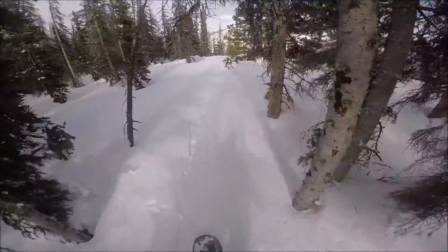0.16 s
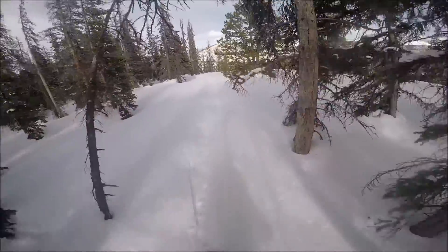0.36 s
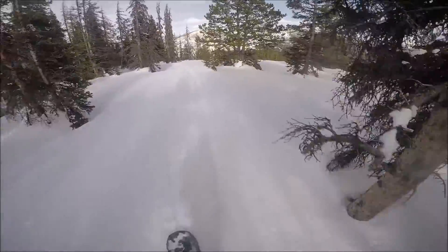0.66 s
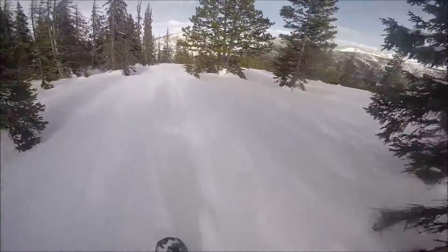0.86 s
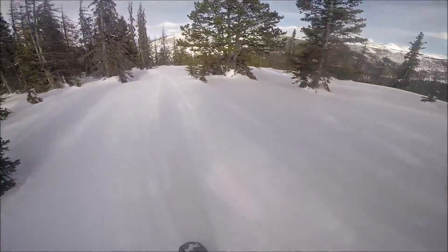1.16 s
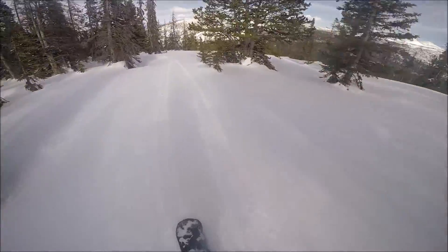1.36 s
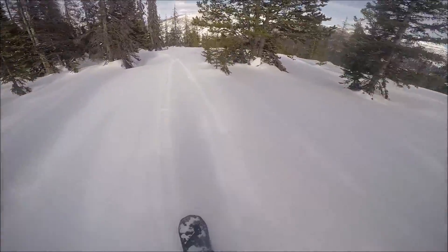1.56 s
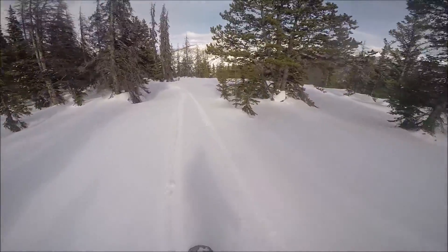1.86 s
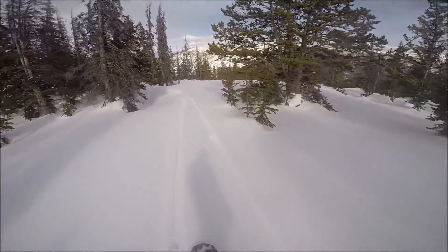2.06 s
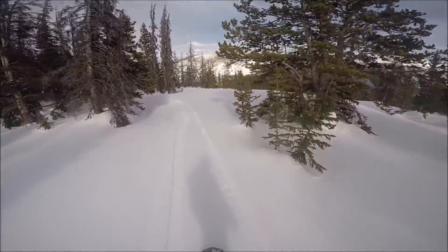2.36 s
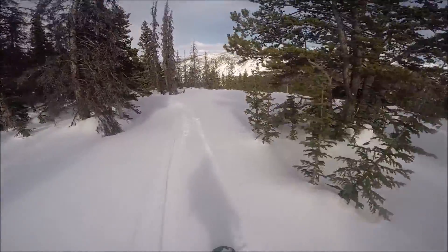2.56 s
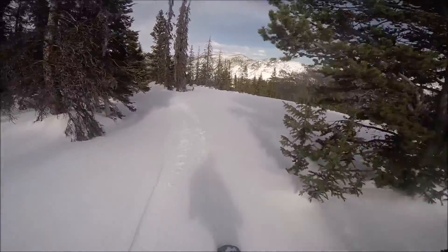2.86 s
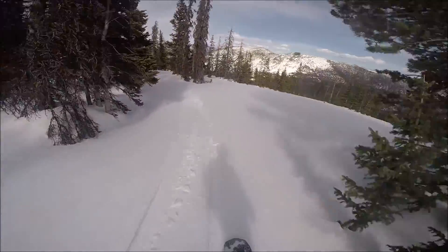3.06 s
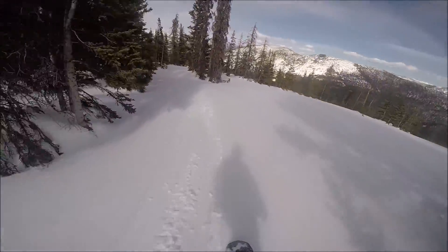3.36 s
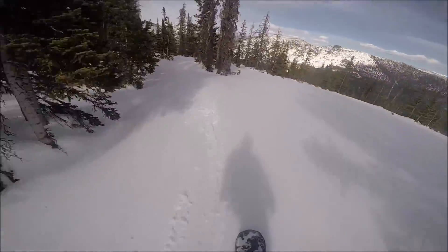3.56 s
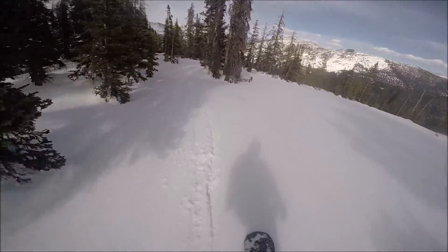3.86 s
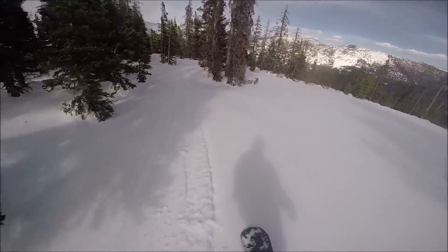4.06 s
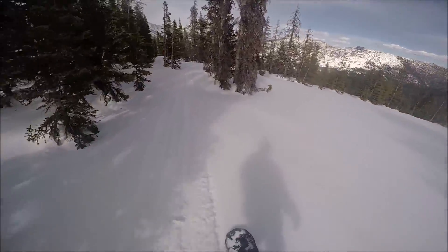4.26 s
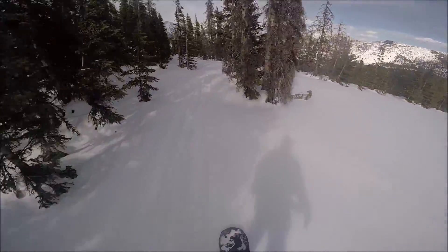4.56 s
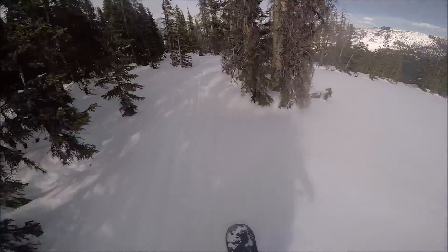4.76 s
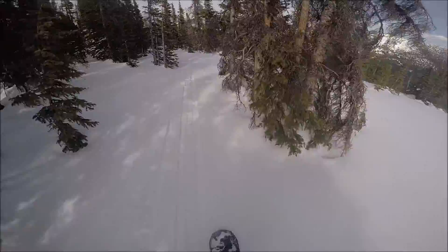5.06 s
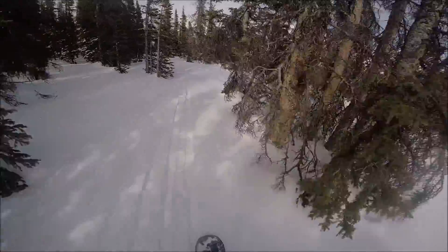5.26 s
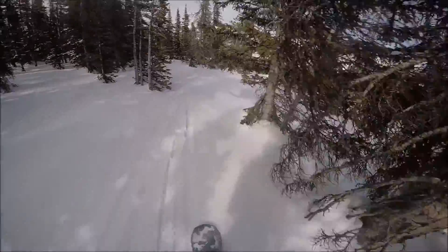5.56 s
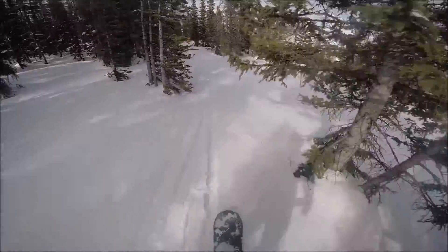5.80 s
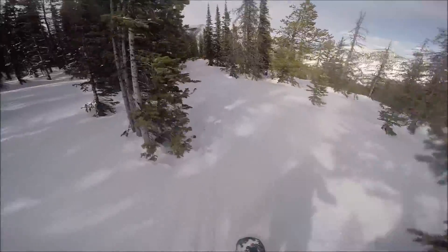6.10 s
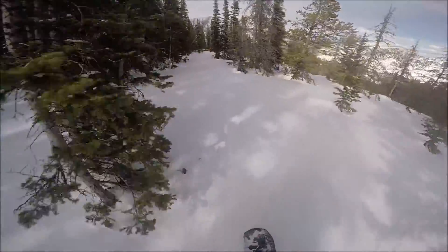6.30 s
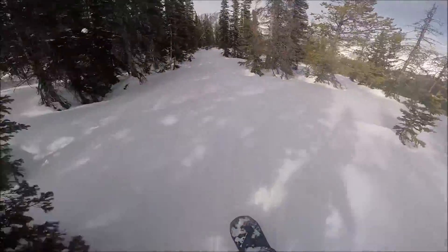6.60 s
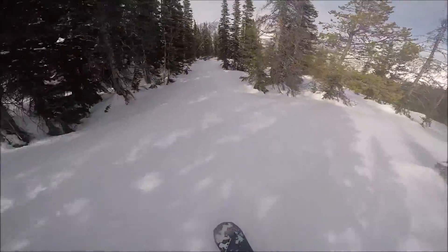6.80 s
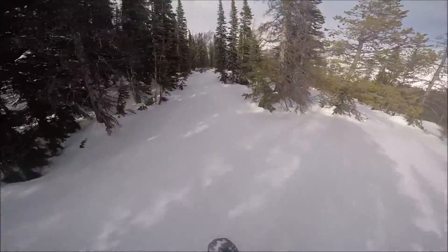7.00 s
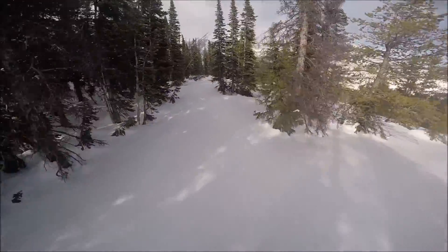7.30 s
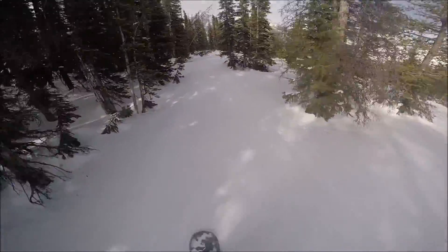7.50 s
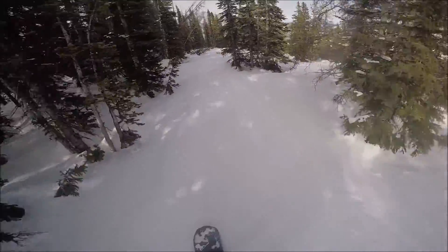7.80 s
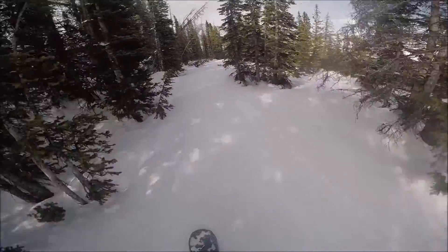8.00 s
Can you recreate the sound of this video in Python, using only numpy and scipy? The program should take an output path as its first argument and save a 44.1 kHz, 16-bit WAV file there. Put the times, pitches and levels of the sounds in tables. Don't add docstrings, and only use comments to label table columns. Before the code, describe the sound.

Outdoors on a wooded snowy slope, a board slides through powder, heard through a worn plastic case. Wind thumps and shakes the case, its strap rubs, ticks and briefly squeaks. The quiet glide swells into a hollow, grainy hiss with brighter sprays; one sharp branch slap dominates late, followed by the strongest snow rush and little pinging knocks.

```python
import sys
import numpy as np
from scipy import signal
from scipy.io import wavfile
from scipy.ndimage import uniform_filter1d

SR = 44100
rng = np.random.default_rng(int(sys.argv[2]) if len(sys.argv) > 2 else 0)


def volts(x):
    e = np.asarray(x, float) / 20
    return 10 ** e


def digitize_waveform(pressure):
    field = np.atleast_2d(pressure).T
    bounded = np.clip(field, -1, 1)
    quanta = np.round(bounded * 32767).astype(np.int16)
    wavfile.write(sys.argv[1], SR, quanta)


N = 359104

# frequency in Hz, width in Hz, gain in dB.
CAVITY = (1465, 47, 8.66)
# time in seconds, level in dB.
PACE = [
    (0.0, -9.5),
    (0.6, -4.5),
    (1.8, -6.5),
    (3.0, -7),
    (3.5, 0),
    (4.7, 1),
    (5.5, 3),
    (6.6, 3),
    (8.14, 5),
]
# frequency in Hz, level in dB, 60 dB decay time in seconds.
STRUCK = [(268, -0.5, 0.04), (470, -3.5, 0.027), (800, -5.5, 0.019), (1370, -6, 0.01), (1550, -0.5, 0.0073),
          (2000, -1, 0.0071), (2630, 3, 0.013), (3380, -8, 0.014), (4450, -4, 0.0091), (4170, -3, 0.011),
          (6400, -21, .008), (7800, -12, 0.0029)]


def rms_one(x):
    return x / np.sqrt(np.mean(x ** 2) + 1e-20)


def in_time(rows):
    s, *columns = np.transpose(rows)
    return [np.interp(np.arange(N) / SR, s, c) for c in columns]


def drift(rate):
    r = np.exp(-80 * np.pi * rate / SR)
    slow = signal.lfilter([1], [1, -2 * r, r * r], rng.standard_normal(N // 40 + 2002))[2000:]
    return np.interp(np.arange(N) / 40, np.arange(len(slow)), rms_one(slow))


def swells(rows, height):
    t = np.arange(0, N, 40) / SR
    total = sum(height(value) * np.exp(-(2 * (t - s) / length) ** 2) for s, value, length in rows)
    return np.interp(np.arange(N) / SR, t, total)


def evened(x, share, seconds):
    level = np.sqrt(uniform_filter1d(x ** 2, int(seconds * SR)) + 1e-3 * np.mean(x ** 2))
    return rms_one(x / level ** share)


def resonate(x, hz, width_hz):
    r = np.exp(-np.pi * width_hz / SR)
    poles = [1, -2 * r * np.cos(2 * np.pi * hz / SR), r * r]
    return signal.lfilter(np.array([1, 0, -1]) * (1 - r * r) / 2, poles, x)


def ring(push, hz, t60):
    r, w = volts(-60 / (t60 * SR)), 2 * np.pi * hz / SR
    return signal.lfilter([0, np.sin(w)], [1, -2 * r * np.cos(w), r * r], push + 1e-18)


def grains(per_s, spread_db):
    sizes = volts(spread_db * np.minimum(rng.exponential(1, N), 4)) * rng.choice([-1, 1], N)
    return rms_one(sizes * (rng.random(N) < per_s / SR))


def banded(sources, spectrum, patchy_db, bright_db=0):
    out, plain = 0, 0
    edges = 110 * 2 ** np.arange(0, 7.4, 1 / 3)
    hz_points, db_points = np.transpose(spectrum)
    together = np.tanh(drift(16))
    for k, (low, high) in enumerate(zip(edges, edges[1:])):
        hz = np.sqrt(low * high)
        band = signal.sosfilt(signal.butter(2, [low, high], "band", fs=SR, output="sos"), sources[k % 2])
        level_db = np.interp(np.log(hz), np.log(hz_points), db_points)
        band *= volts(level_db + patchy_db * (together + drift(58)))
        plain = plain + np.mean(band ** 2)
        if hz > CAVITY[0]:
            band = band * volts(bright_db * min(np.log2(hz / CAVITY[0]), 1.3))
        out = out + band
    return out / np.sqrt(plain)


def snow():
    # time in seconds, load in dB, edge angle as spray brightness in dB.
    glide = [(0.0, -68, -17), (0.45, -59, -15), (1.0, -60.5, -5), (1.7, -73, 25), (2.13, -66.5, -14),
             (2.8, -63.5, -10), (3.3, -58.5, -9), (3.8, -53.5, -9.5), (4.5, -47.5, -14),
             (4.95, -50.5, -3.5), (5.5, -46.5, 0.5), (5.85, -51.5, -7.5), (6.35, -47, -6),
             (6.72, -53.5, -6.5), (7.19, -42, -7.5), (7.55, -40, -6.5), (7.66, -46.5, -8),
             (8.14, -51, -1.5)]
    # time in seconds, load change in dB, length in seconds.
    digs = [(0.0, 14, 0.084), (.28, 5, 0.27), (1, -5.5, 0.57), (2.3, 7, 0.14), (2.94, 4, 0.14),
            (3.07, -2, 0.11), (3.232, 2, 0.082), (3.33, -2.5, .06), (3.41, 6, .1), (3.55, 8.5, 0.15),
            (3.8, -3, 0.038), (3.85, 0, 0.04), (4.12, 2.5, 0.087), (4.35, 1.2, 0.11), (5.01, 1.5, 0.19),
            (5.23, 2.8, 0.058), (5.4, 3.5, 0.066), (5.51, -4, 0.05), (5.68, 3, 0.35), (6, 4, 0.18),
            (6.28, -2, 0.13), (6.6, -5.5, 0.038), (6.662, 3.5, 0.041), (7.0, -1.5, 0.25), (7.13, 0, 0.1),
            (6.145, 5, 0.016), (7.27, 1.5, 0.11), (7.51, 1, 0.053), (7.78, 0, 0.041), (7.94, 2, 0.07),
            (8.05, 10.5, 0.21)]
    # time in seconds, brightness in dB, length in seconds.
    crusts = [
        (3.687, 5.5, 0.023),
        (3.85, 2, 0.027),
        (4.872, 4, 0.044),
        (5.012, 5.5, 0.042),
        (5.146, 4.5, 0.039),
        (5.228, 2.5, 0.072),
        (5.39, 0.5, 0.051),
        (5.465, 1.5, 0.019),
        (5.664, 4, .08),
        (5.905, 0.5, 0.032),
    ]
    # frequency in Hz, density in dB per Hz.
    hiss_spectrum = [(350, -41), (600, -28.5), (1100, -1.5), (1460, 0), (1700, -2), (2290, -6.5),
                     (4190, -11.5), (5630, -27.5), (6160, -25), (7400, -39), (8600, -60)]
    # frequency in Hz, density in dB per Hz.
    rumble_spectrum = [(110, -13), (150, 3), (220, 1.5), (300, -6.5), (480, -9), (700, -13.5),
                       (1000, -23.5), (3000, -48)]
    load_db, spray_db = in_time(glide)
    dig_db = swells(digs, float)
    load_db = load_db + dig_db
    rumble_db = -56 + in_time(PACE)[0] + 0.11 * (load_db - load_db.mean())
    burst_db = swells(crusts, float) - 0.15 * dig_db
    bright_db = 0.49 * (np.clip(spray_db, -14, 4) + 5.5) + burst_db

    crystals = [rng.standard_normal(N) + 0.57 * grains(1500, spread_db=7.0) for side in range(2)]
    hiss = banded(crystals, hiss_spectrum, patchy_db=0.93, bright_db=bright_db)
    rumble = volts(rumble_db) * banded(crystals, rumble_spectrum, patchy_db=1.3)

    hz, width_hz, db = CAVITY
    waver_hz, waver_db = 29.6, 1
    flex = .5 + .5 * np.tanh(drift(6.9))
    sung = flex * resonate(hiss, hz + waver_hz, width_hz)
    sung += (1 - flex) * resonate(hiss, hz - waver_hz, width_hz)
    hiss += (volts(db + 0.5 + waver_db * drift(23.5)) - 1) * sung
    return volts(load_db + 1.0) * hiss + rumble


def wind():
    # time in seconds, level in dB, length in seconds.
    gusts = [(.43, -43, 0.24), (.7, -32, 0.17), (.97, -34.5, 0.1), (1.22, -31.5, 0.072), (1.5, -30.5, 0.18),
             (1.9, -34, 0.21), (2.15, -36.5, 0.2), (2.38, -37, 0.27), (2.68, -46.5, 0.39),
             (3.19, -39, 0.17), (3.5, -38, 0.085), (4.08, -31, 0.042), (4.67, -32, 0.1), (4.92, -25, 0.17),
             (5.33, -32.5, 0.21), (5.46, -26.5, 0.095), (5.65, -29, 0.097), (5.85, -26.5, 0.11),
             (6.1, -27.5, 0.11), (6.3, -26, 0.12), (6.78, -32, 0.29), (7.03, -38, 0.091), (7.68, -44, 0.17),
             (7.8, -30, 0.072), (7.96, -25.5, 0.13)]
    # time in seconds, level in dB, length in seconds.
    bumps = [(.4, -47.5, 0.15), (.91, -36, 0.12), (1.05, -42.5, 0.12), (1.17, -45, 0.098),
             (1.44, -36, 0.071), (1.95, -49.5, 0.15), (2.43, -45, 0.085), (2.59, -49, 0.064),
             (2.79, -59, 0.057), (3.06, -44, 0.11), (3.38, -35.5, 0.068), (3.83, -45.5, 0.19),
             (3.94, -39, 0.045), (4.04, -41, 0.039), (4.17, -54, 0.12), (4.83, -40.5, 0.12),
             (5.27, -40.5, 0.7), (5.57, -50, 0.29), (6.3, -41.5, 0.3), (6.66, -45.5, 0.35),
             (6.82, -44, 0.056), (7.2, -49, 0.77), (7.62, -52, 0.096), (7.76, -46, 0.069),
             (8.09, -42, 0.12)]
    mount_hz, mount_width_hz, lull_db = 78.5, 9.6, -1
    pace_db, = in_time(PACE)
    buffet = volts(-40.5 + 0.52 * pace_db + lull_db * drift(2.4)) + swells(gusts, volts)
    shake = volts(-44 + 0.91 * pace_db + lull_db * drift(5.8)) + swells(bumps, volts)

    push = rng.standard_normal((2, N + SR))
    lumps = signal.sosfilt(signal.butter(2, [14, 37], "band", fs=SR, output="sos"), push[0])
    swing = resonate(push[1], mount_hz, mount_width_hz)
    heavy = signal.butter(2, 60, fs=SR, output="sos")
    steep = signal.butter(4, 110, fs=SR, output="sos")
    lumps = signal.sosfilt(heavy, buffet * evened(lumps[SR:], 0.51, 0.093))
    swing = signal.sosfilt(steep, shake * evened(swing[SR:], 0.26, 0.041))
    flutter = rms_one(resonate(resonate(push[0], 188.0, 42), 188.0, 42)[SR:])
    return lumps + swing + volts(-34.0) * uniform_filter1d(shake, SR // 2) * flutter


def self_noise():
    # frequency in Hz, density in dB per Hz.
    noise_spectrum = [(71, -31), (120, -22), (339, -11), (955, -18.5), (1430, -21), (4220, -26.5),
                      (9000, -30), (15500, -32.5)]
    return volts(-65) * banded(rng.standard_normal((2, N)), noise_spectrum, patchy_db=.25)


def held(start, length, height):
    t = np.arange(0, N, 40) / SR
    start, length = start[:, None], length[:, None]
    edge_s = 0.069
    shape = np.clip(np.minimum(t - start, start + length - t) / edge_s + .5, 0, 1)
    return np.interp(np.arange(N) / SR, t, np.max(shape * height[:, None], axis=0))


def strap():
    # frequency in Hz, width in Hz, level in dB.
    shell_modes = [(1970, 100, 4.5), (2700, 280, -1), (3600, 260, -3), (4300, 240, 1), (5230, 240, -3),
                   (6125, 200, -4.5), (7640, 580, -15.5), (8400, 280, -11), (9840, 1900, -15.5)]
    # start in seconds, length in seconds, level in dB,
    # pressure in dB that favours the lower resonances.
    drags = [(0.34, 0.53, -80, -4), (0.704, 0.71, -81, 13), (1.06, 0.35, -75, 11.5), (1.403, 0.21, -70, 7),
             (1.6, .17, -80, 4), (1.716, 0.89, -77.5, 12.5), (2.3, 0.76, -80.5, 4), (3.595, 1.4, -83, -15),
             (4.92, 0.21, -80.5, 30), (5.225, 0.19, -68, 7), (5.374, 0.41, -66, -7), (5.848, 0.36, -81, 6),
             (6.242, 0.48, -71.5, 2), (6.747, 0.27, -69, 5), (7.328, 0.48, -75, 7), (7.8, .4, -71.5, 4)]
    # start in seconds, level in dB, frequency in Hz, width in Hz, fade in seconds.
    squeaks = [
        (1.945, -55.5, 2140, 150, 0.18),
        (1.96, -58.5, 1514, 60, 0.057),
        (1.96, -57.5, 2060, 150, 0.32),
    ]
    start, length, drag_db, pressure_db = np.transpose(drags)
    rest_db = -83
    slip = volts(1.5 * drift(13))
    friction = rng.standard_normal(N) + 0.4 * grains(900, spread_db=4.0)
    friction = signal.sosfilt(signal.butter(2, 1500, "high", fs=SR, output="sos"), friction)
    modes = [(-1) ** k * volts(db) * resonate(friction, hz, width)
             for k, (hz, width, db) in enumerate(shell_modes)]
    low, high = rms_one(sum(modes[:5])), rms_one(sum(modes[5:]))
    pressed = held(start, length, volts(drag_db + 0.57 * pressure_db + 4.5))
    dragged = held(start, length, volts(drag_db))
    out = (volts(rest_db + 9) + pressed) * slip * low + (volts(rest_db) + dragged) * volts(0.5) * high
    for s, db, hz, width, fade in squeaks:
        age = np.maximum(np.arange(N) / SR - s, 0) / fade
        shape = np.minimum(age * 12, 1) * np.exp(-age ** 1.9)
        tone = resonate(resonate(friction, hz, width), hz, width)
        out += volts(db) * shape * evened(tone, 1.0, 0.029)
    return out


def puffs():
    # time in seconds, level in dB, length in seconds.
    clouds = [
        (.68, -70, .03),
        (5.39, -65, .04),
        (5.44, -60, .03),
        (5.59, -64, .04),
        (5.65, -60, .05),
        (5.84, -59, .028),
        (6.229, -48, .012),
        (6.84, -66, .04),
    ]
    dust = signal.sosfilt(signal.butter(2, 8000, "high", fs=SR, output="sos"), rng.standard_normal(N))
    return swells(clouds, volts) * dust


def contacts(rows, modes, crack_db):
    out, soft = np.zeros(N), signal.butter(2, [600, 7000], "band", fs=SR, output="sos")
    t = np.arange(SR // 8) / SR
    for s, peak_db, bright_db, length, body_db in rows:
        at = round(s * SR)
        rise = np.minimum(t / length / 0.26 + 0.27, 1)
        fall = np.exp(-(t / max(length, 3e-4)) ** 2)
        chatter = signal.sosfilt(soft, rng.standard_normal(len(t)) * rise * fall)
        luck = rng.normal(0, 1.5, len(modes))
        hit = volts(crack_db) * chatter / np.max(np.abs(chatter))
        for (hz, db, t60), luck_db in zip(modes, luck):
            tilt_db = body_db if hz < 1000 else bright_db * np.log2(max(hz, 1800) / 2000)
            mode = ring(chatter, hz, t60)
            hit = hit + volts(db + luck_db + tilt_db) * mode / np.max(np.abs(mode))
        out[at:at + len(t)] += volts(peak_db) * hit / np.max(np.abs(hit))
    return out


def strap_ticks():
    # time in seconds, peak in dB, brightness in dB per octave, contact length in seconds,
    # body in dB of the modes under 1 kHz.
    ticks = [(.7945, -34.5, -12, 0.0047, 3), (1.2425, -34, -4, 0.005, 2), (1.415, -50, -12, .003, 14),
             (1.4825, -34, 0, 0.0021, 4.5), (1.048, -43, 6, 0.0032, -10), (1.144, -43, 4, 0.0022, -8),
             (1.584, -41.5, 7, 0.0022, -7), (1.799, -45, -2, 0.0028, -10), (2.296, -48, -8, 0.0028, -9),
             (3.233, -52, -6, 0.0017, -6), (3.523, -42, -12, .002, -7), (5.333, -32.5, -3, 0.0021, -2),
             (6.658, -45, -8, .002, -6), (7.949, -39, -8, .002, 0)]
    return contacts(ticks, STRUCK, crack_db=-11)


def pings(rows):
    out, t = np.zeros(N + SR), np.arange(SR // 8) / SR
    touch_s, t60_s = 0.0026, 0.041
    for s, db, hz in rows:
        decay = volts(-60 * t / t60_s * max(hz / CAVITY[0], 1) ** 0.87)
        shape = (1 - np.exp(-t / touch_s * 3)) * decay
        out[round(s * SR):][:len(t)] += volts(db - 4.5) * shape / shape.max() * np.sin(2 * np.pi * hz * t)
    return out[:N]


def buckle_taps():
    # time in seconds, peak in dB, frequency in Hz.
    taps = [(.796, -36, 265), (.7958, -40, 2030), (1.196, -56, 900), (1.2428, -43, 4620),
            (1.2435, -42, 1350), (1.244, -42, 260), (1.414, -49, 500), (1.483, -44, 760),
            (1.508, -56, 1150), (6.2155, -22, 4550), (6.2365, -19, 4550), (6.237, -19, 1950),
            (6.2245, -7, 2780), (6.2255, -18, 1390), (6.227, -24, 430)]
    return pings(taps)


def jolts():
    # time in seconds, level in dB, frequency in Hz (negative if
    # pushed backwards), 60 dB decay time in seconds, push length in seconds.
    pushes = [
        (1.467, -17.5, 79, 0.47, 0.0075),
        (1.485, -19, 38, 0.53, 0.011),
        (1.491, -17.5, 81.5, 0.34, 0.004),
        (2.429, -19, 26, 1.9, .01),
        (6.2185, -15.5, 95, 0.073, .001),
        (6.2245, -10, -105, 0.065, .001),
        (6.2291, -1.5, 81.5, 0.19, 0.00041),
        (6.241, -12, 41, 0.17, 0.0034),
        (7.093, -47, 69, .25, .005),
    ]
    out = np.zeros(N)
    for s, db, hz, t60, length in pushes:
        at, touch = round((s - length / 2) * SR), np.hanning(int(length * SR) + 3)
        push = np.zeros(min(2 * SR, N - at))
        push[:len(touch)] = volts(db) * touch / touch.sum()
        out[at:at + len(push)] += ring(push, hz, t60)
    return out


def ice_pellets():
    # time in seconds, peak in dB, brightness in dB per octave, contact length in seconds,
    # body in dB of the modes under 1 kHz.
    pellets = [
        (1.586, -48, 14, .003, -20),
        (4.881, -45, 14, .002, -20),
        (7.203, -42, 14, .003, -20),
        (7.823, -46, 14, .002, -20),
    ]
    return contacts(pellets, STRUCK, crack_db=-30)


def crust_flecks():
    # time in seconds, peak in dB, frequency in Hz.
    flecks = [(3.2326, -42, 1470), (3.5229, -34, 1250), (3.8392, -40, 1470), (3.9729, -37, 1520),
              (4.2043, -53, 1450), (4.3146, -53, 1430), (4.4448, -47, 1470), (4.5805, -38, 1400),
              (4.8594, -38, 1500), (4.997, -34, 1430), (5.1163, -40, 1520), (5.1901, -36, 1510),
              (5.6397, -44, 1360), (5.9688, -45, 1410), (6.1444, -31, 1340), (6.265, -33, 1460),
              (6.4567, -45, 1460), (6.6583, -38, 1490), (7.0658, -42, 1460), (7.1791, -35, 1580),
              (7.269, -28, 1500), (7.3592, -33, 1380), (7.463, -26, 1450), (7.4995, -29, 1570),
              (7.7787, -37, 1440), (7.8965, -36, 1370), (7.9493, -33, 1480), (7.9982, -36, 1450),
              (8.0551, -27, 1510)]
    return pings(flecks)


def branch_whip():
    # time in seconds, peak in dB, brightness in dB per octave, contact length in seconds,
    # body in dB of the modes under 1 kHz.
    blows = [
        (6.2118, -18.5, 5, 0.0058, 13),
        (6.2241, -3, 4, 0.0087, 7),
        (6.2345, -13, -4, 0.0071, 2),
    ]
    # frequency in Hz, level in dB, 60 dB decay time in seconds.
    whipped_modes = [(181, -12, 0.17), (294, -25.5, 0.04), (410, -19.5, 0.05), (960, -23, 0.016),
                     (1440, -14, 0.022), (1680, -4.5, 0.011), (2230, -5, 0.0037), (2950, -14, 0.0052),
                     (3240, -7, 0.0054), (2620, -15, 0.0091), (4090, 0, 0.0068), (4660, -16, 0.004),
                     (6300, -25, 0.0027), (8200, -17, 0.0021)]
    return contacts(blows, whipped_modes, crack_db=-12)


def scene():
    own = self_noise()
    shell = strap() + strap_ticks()
    shell += branch_whip()
    shell += ice_pellets() + jolts() + crust_flecks() + buckle_taps()
    return (wind() + snow() + shell + puffs() + own)[None]


def low_pass(x):
    return signal.sosfilt(signal.butter(12, 16160, fs=SR, output="sos"), x)


def record(dry):
    # time in seconds, lower limit in Hz, gain in dB.
    thinned = [(.18, 5000, -12), (.46, 6000, -10), (.72, 2500, -12), (2.51, 2500, -12), (3.6, 4500, -10),
               (4.49, 4500, -12), (4.815, 4000, -13), (5.562, 5200, -10), (.65, 13000, -20),
               (.8, 13000, -20), (.98, 13000, -25), (1.83, 13000, -25), (2.4, 13800, -25),
               (2.422, 12800, -25), (2.45, 14300, -20), (2.485, 12800, -25), (2.525, 12800, -30),
               (2.59, 12800, -30), (2.612, 13000, -20), (2.695, 12800, -30), (2.715, 13800, -30),
               (2.732, 12800, -30), (2.762, 12800, -30), (3.32, 13000, -30)]
    rounded = 1.05 * np.tanh(dry / 1.05)
    out = signal.sosfiltfilt(signal.ellip(12, .5, 50, 15250, fs=SR, output="sos"), rounded)
    fade = np.minimum(1.1 * np.hanning(1536), 1)
    for s, hz, db in thinned:
        at = round(s * SR) - 768
        treble = signal.butter(8, hz, "high", fs=SR, output="sos")
        top = signal.sosfiltfilt(treble, out[:, at:at + 1536])
        out[:, at:at + 1536] -= (1 - volts(db)) * fade * top
    return low_pass(out)


dry = scene()
out = record(dry)
digitize_waveform(out)
```